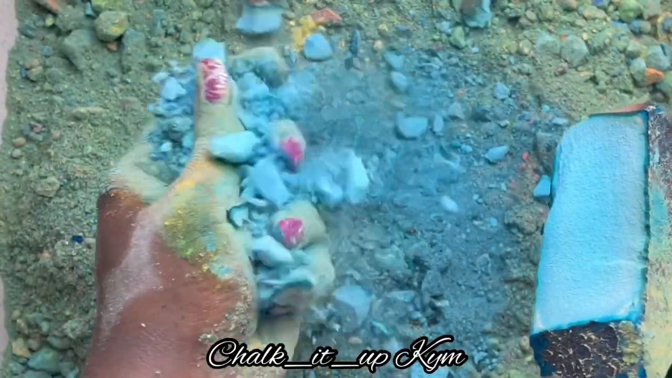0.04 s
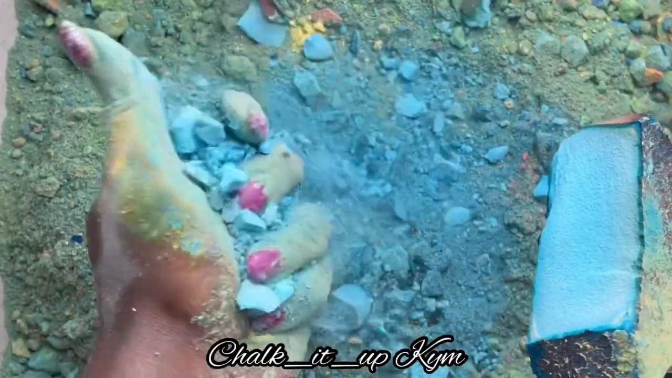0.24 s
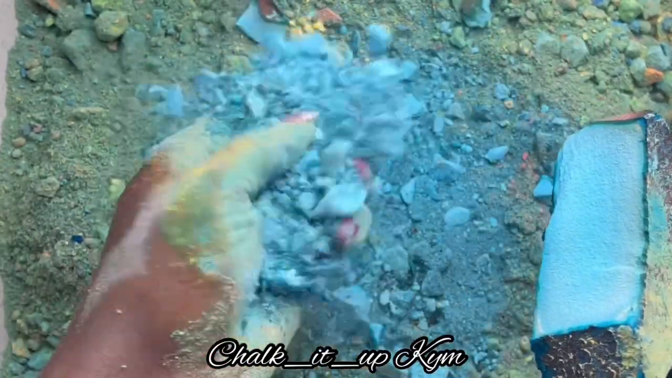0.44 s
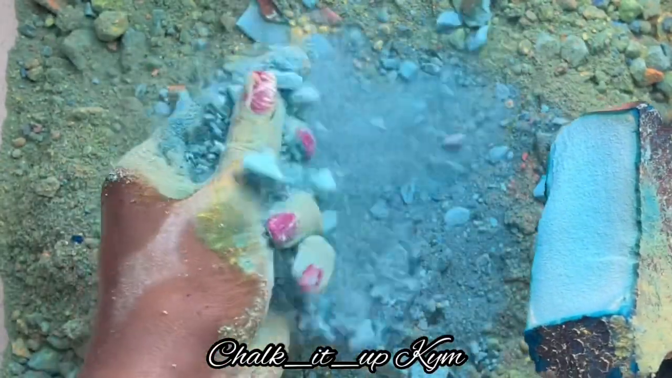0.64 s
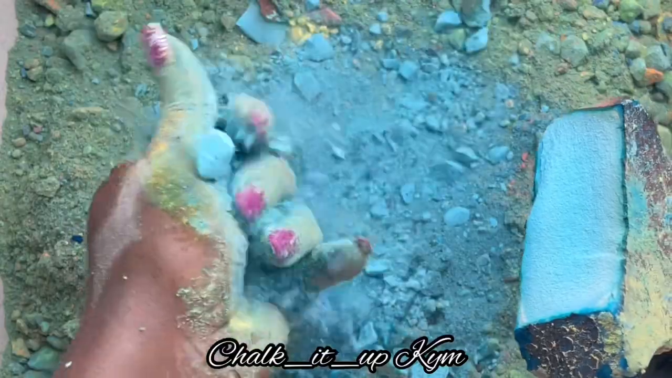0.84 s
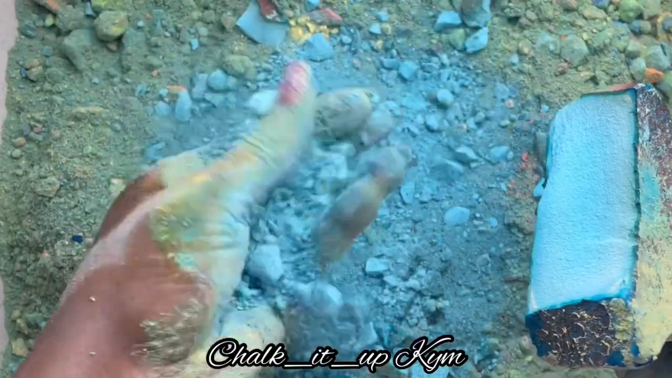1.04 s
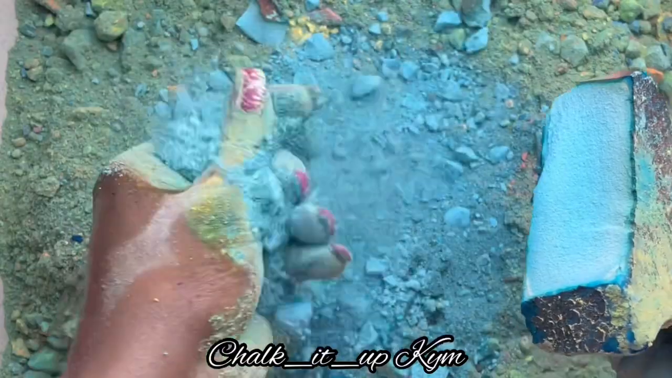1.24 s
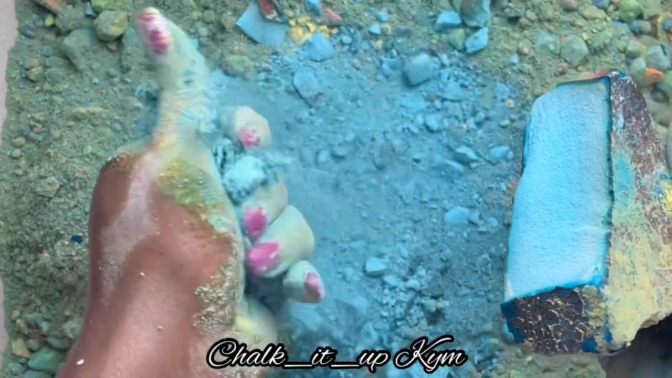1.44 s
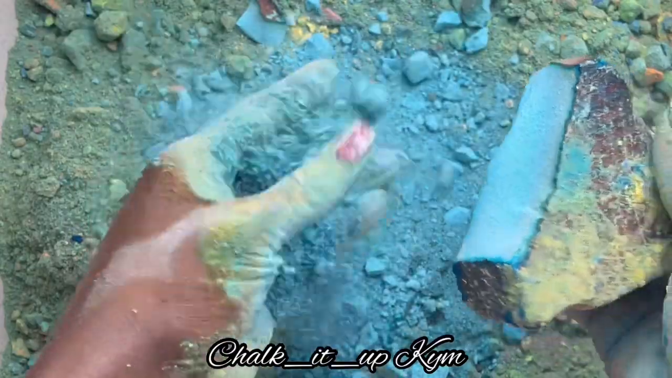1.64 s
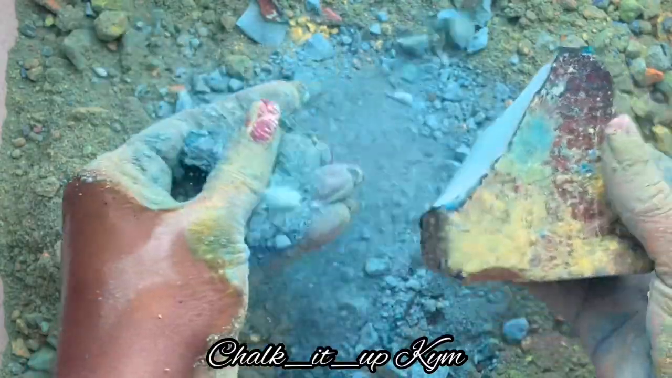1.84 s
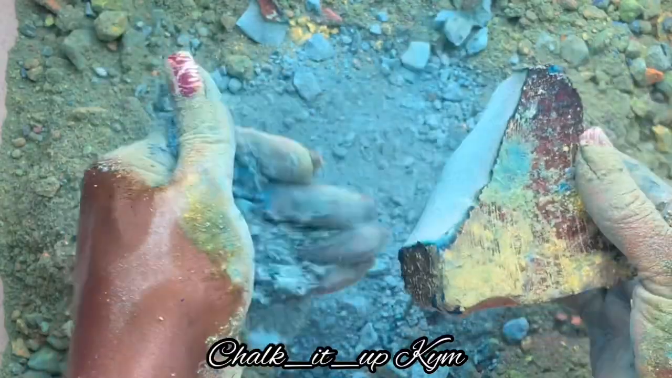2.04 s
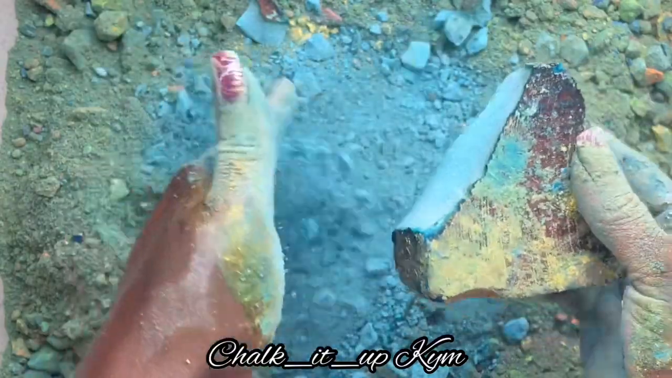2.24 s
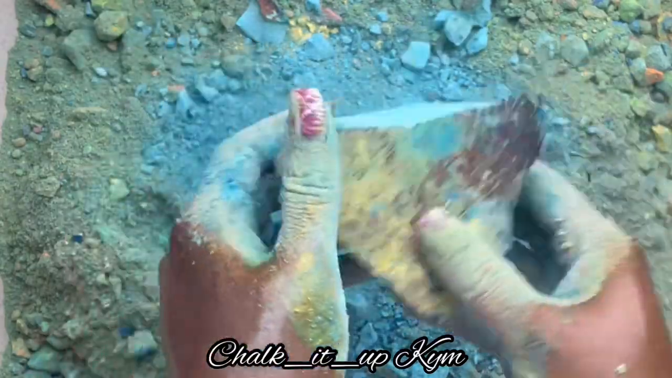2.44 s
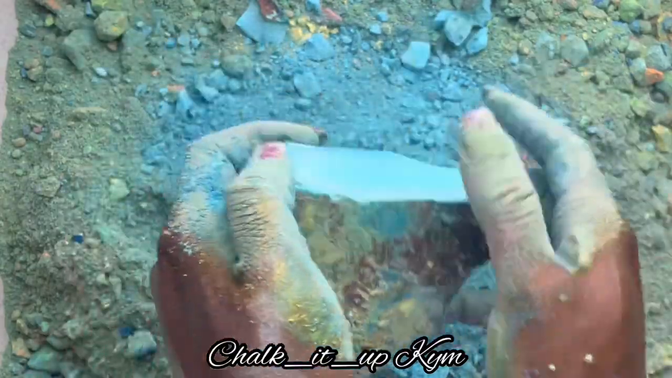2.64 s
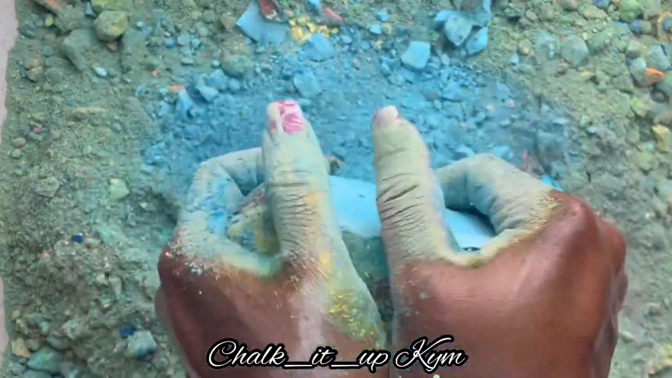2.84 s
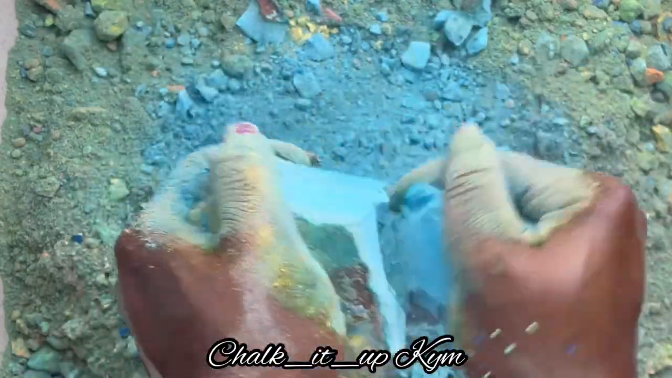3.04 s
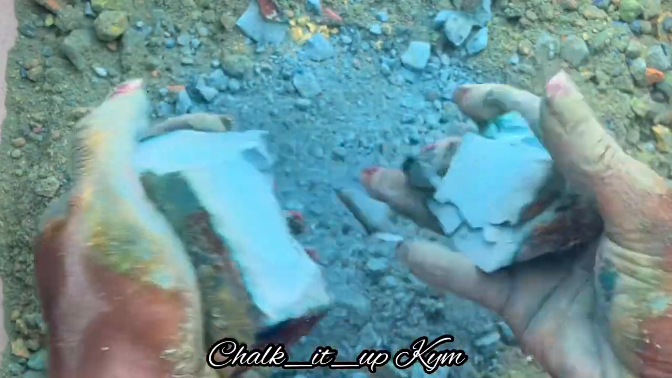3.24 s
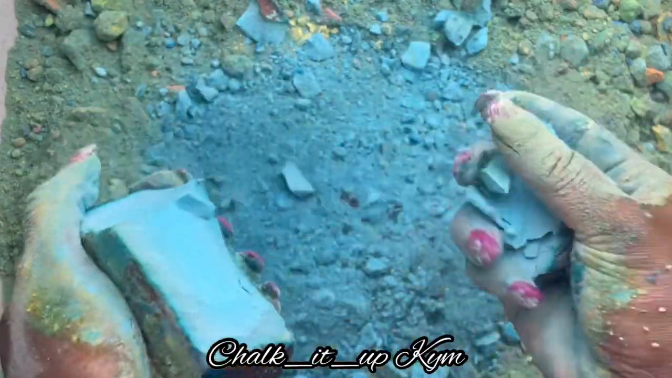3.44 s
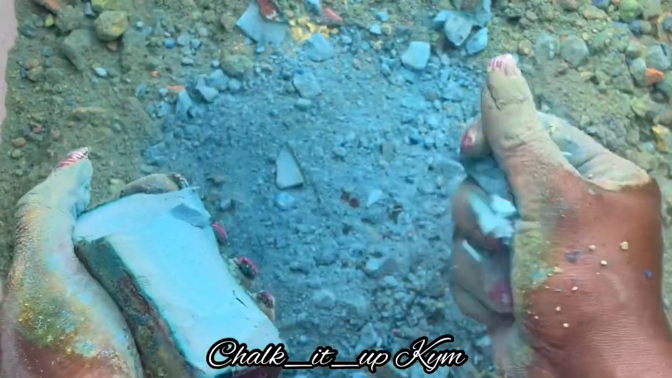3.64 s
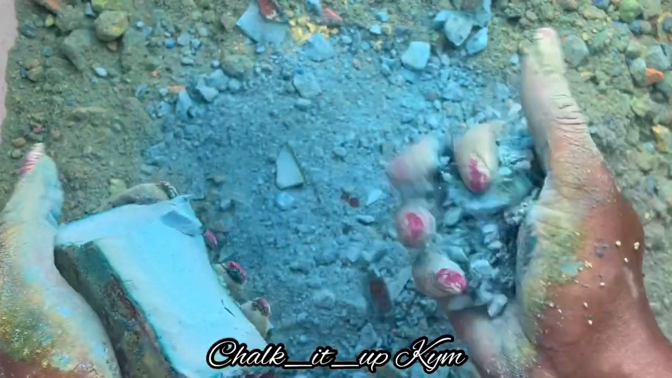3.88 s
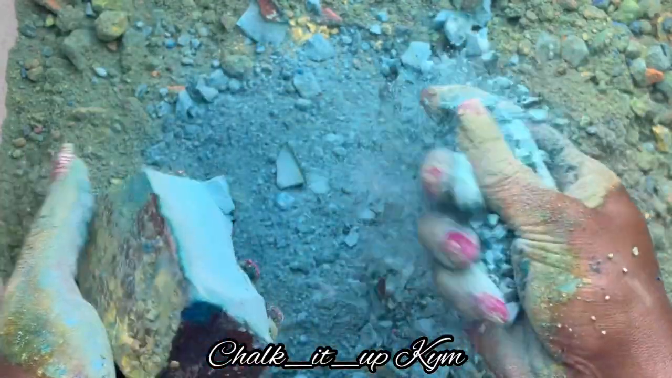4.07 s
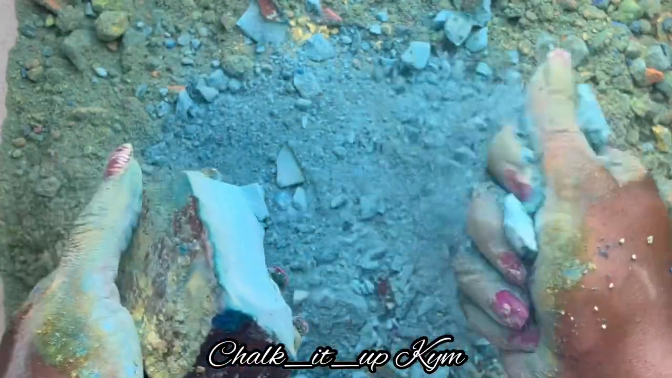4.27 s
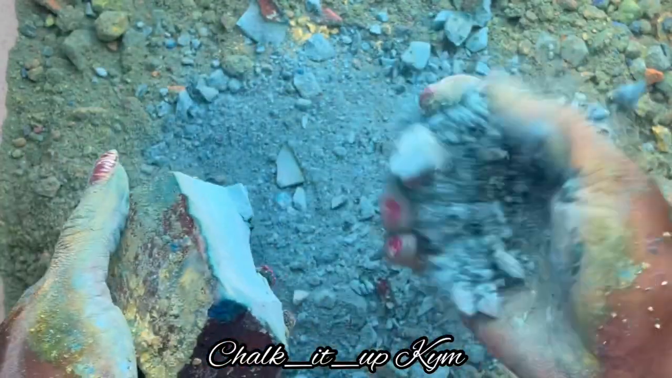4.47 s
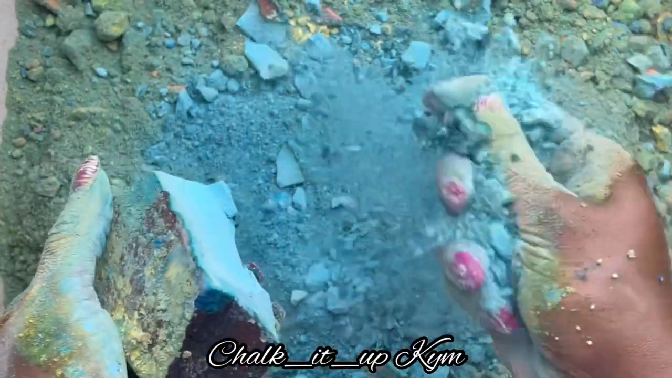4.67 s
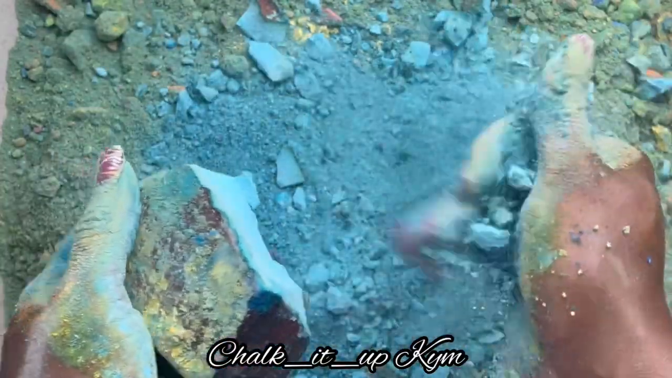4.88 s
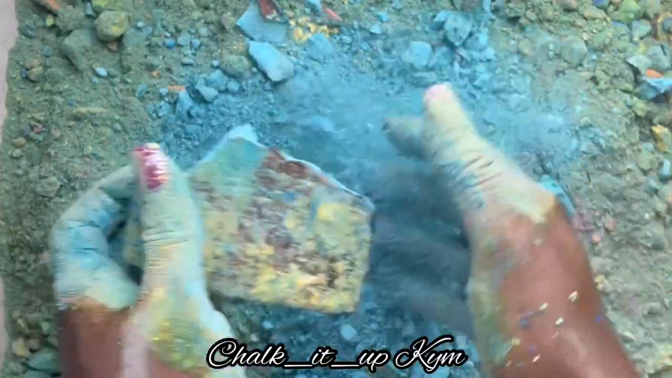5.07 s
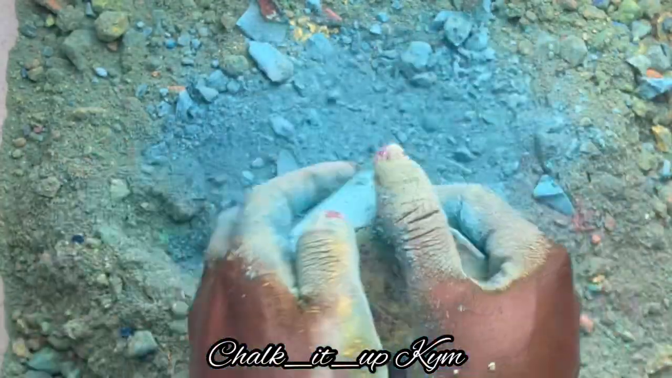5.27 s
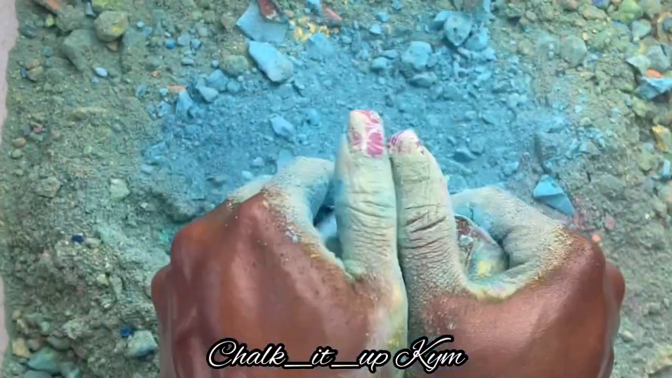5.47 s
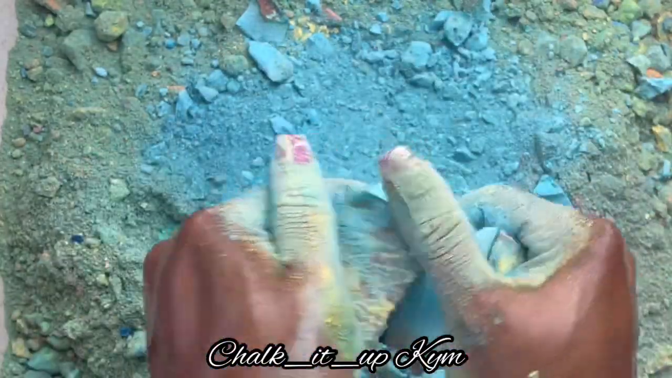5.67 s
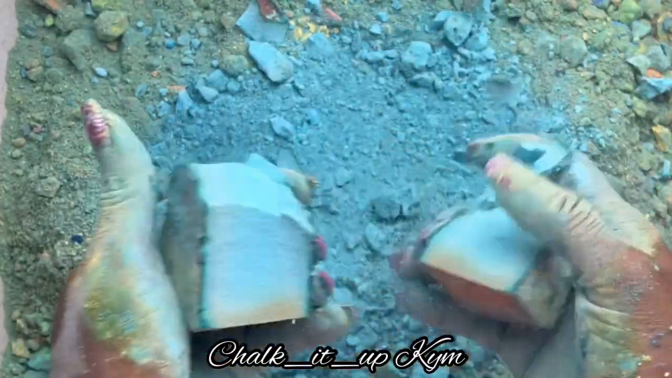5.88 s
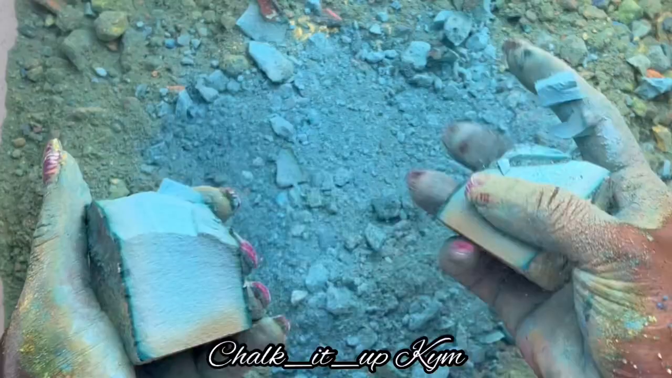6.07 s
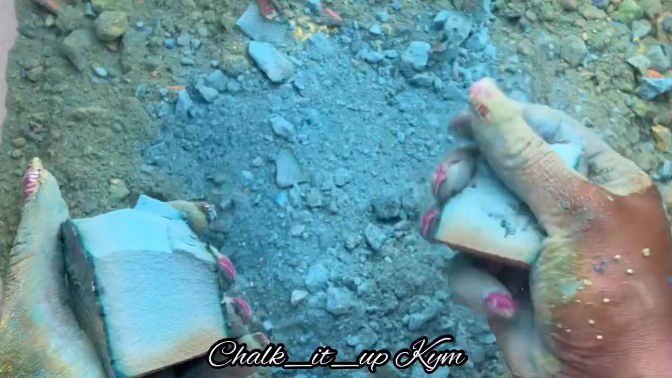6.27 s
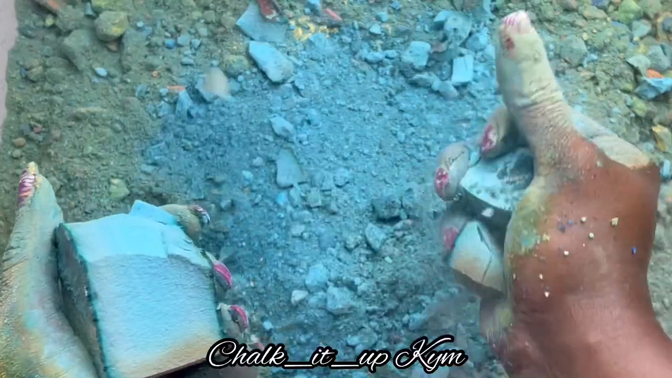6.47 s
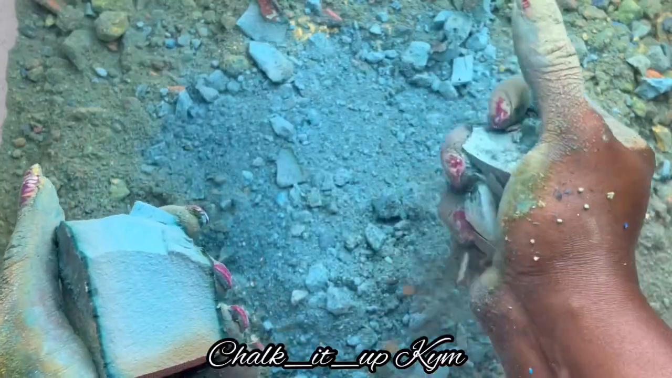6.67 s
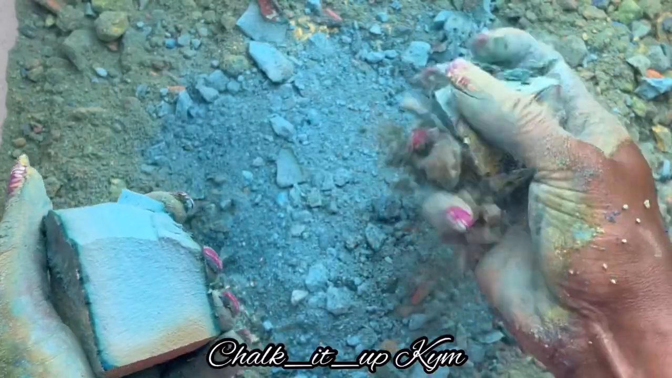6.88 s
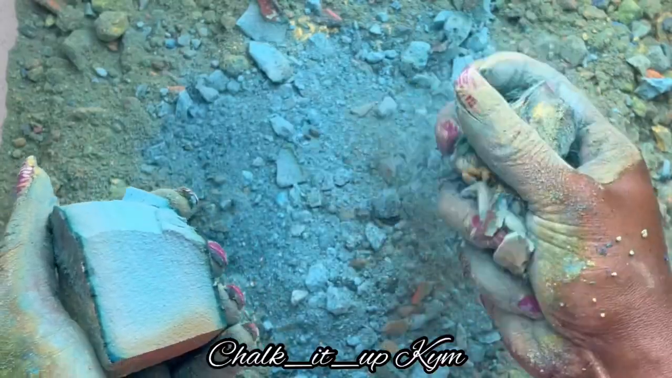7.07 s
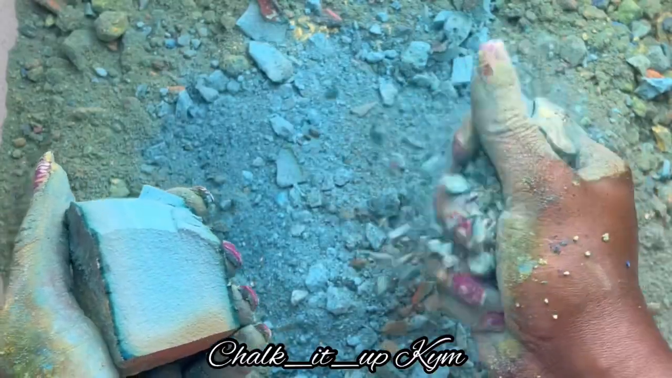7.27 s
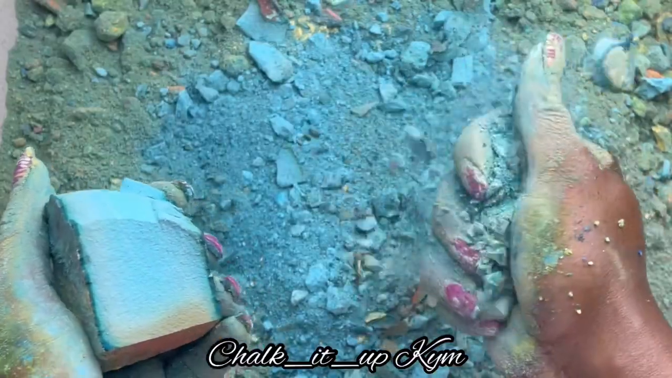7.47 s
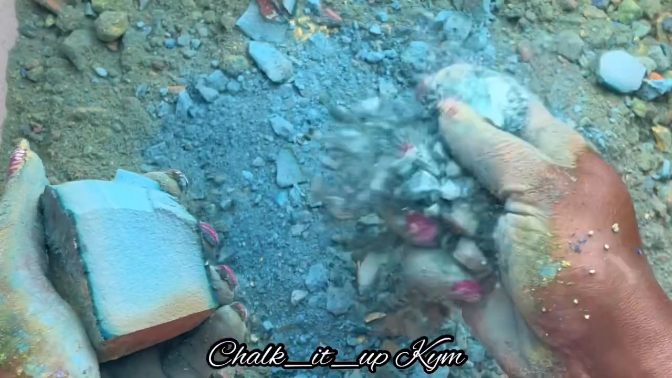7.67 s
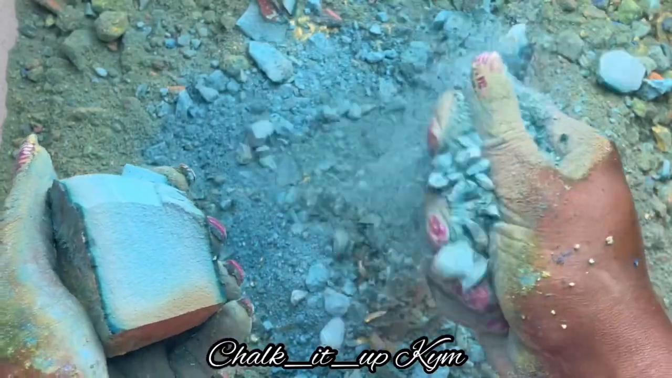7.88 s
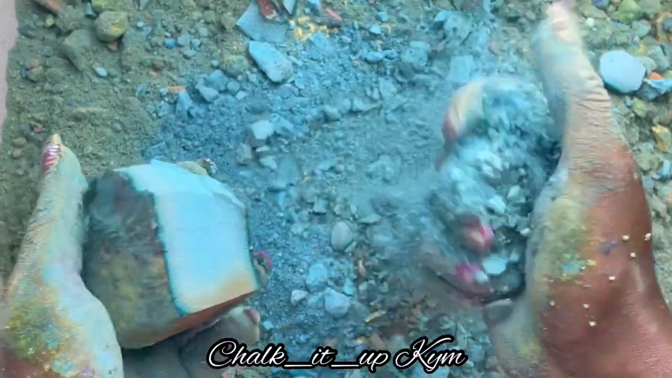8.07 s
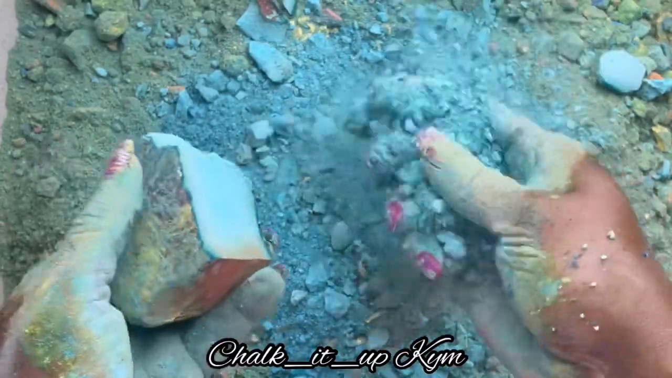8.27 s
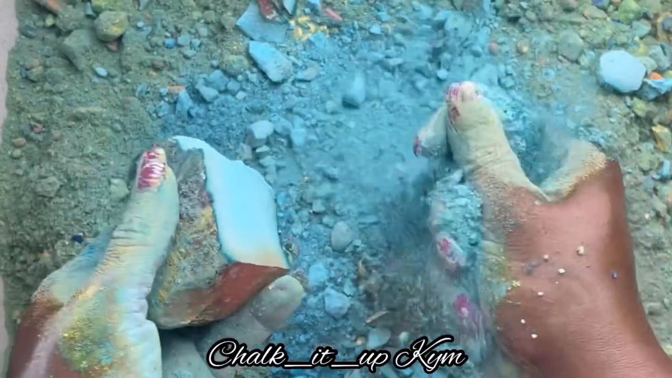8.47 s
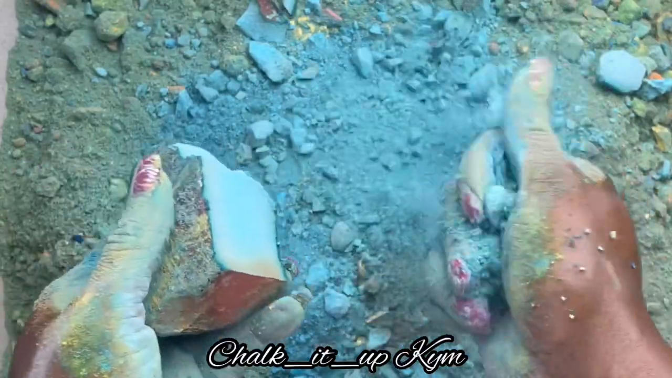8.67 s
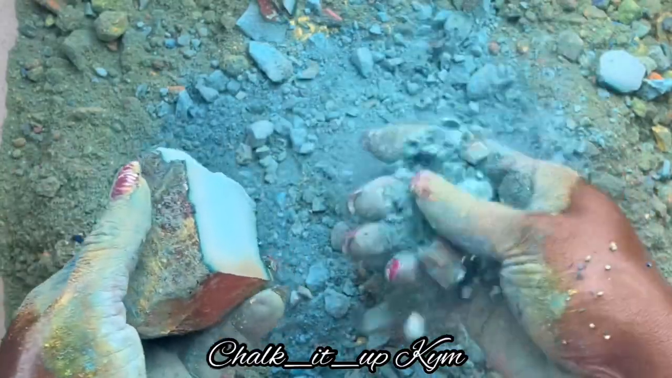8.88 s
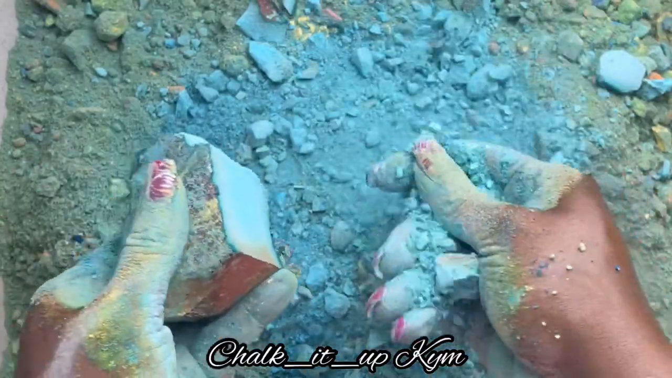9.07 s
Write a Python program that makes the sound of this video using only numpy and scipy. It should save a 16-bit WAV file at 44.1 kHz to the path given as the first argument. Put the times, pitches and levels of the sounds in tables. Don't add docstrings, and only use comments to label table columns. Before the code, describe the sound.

Very close, dry sound of hands crushing soft chalk over a tray of crumbs. Gritty crunches and muffled pops come first, then thin out into rubbing and a faint squeaky drag. A loud double-thudded snap breaks the block, more snaps follow, then quieter crumbling. Another block breaks, and a dense burst of cracks and crunching leads to settling crumbs. A low distant engine rumble and faint hum sit behind.

```python
import sys
import numpy as np
from scipy import signal
from scipy.fft import rfft, irfft, next_fast_len
from scipy.io import wavfile
from scipy.ndimage import uniform_filter1d

SR = 44100
rng = np.random.default_rng(int(sys.argv[2]) if len(sys.argv) > 2 else 0)


def store_wav(level_fs):
    pcm = np.round(np.clip(np.atleast_2d(level_fs), -1, 1) * 32767)
    wavfile.write(sys.argv[1], SR, pcm.T.astype(np.int16))


def elevation(decibels):
    levels = np.asarray(decibels, float)
    return 10 ** (levels / 20)


N = 402191

# centre in Hz,
# width in Hz, level in dB.
HAND_MODES = [(1400, 400, 0), (2030, 400, .5), (3000, 700, -9), (3950, 600, -15), (950, 450, -8)]
# start in s, peak in dB, ring in Hz.
BLOWS = [(0.043, -21, 547), (0.429, -28, 370), (0.485, -23.5, 434), (0.804, -26, 334), (1.162, -19.5, 335),
         (1.38, -22.5, 310), (1.799, -14.5, 364), (2.243, -26, 455), (2.737, -30.5, 115),
         (2.412, -32.5, 107), (2.9195, -4, 260), (3.498, -30.5, 268), (3.601, -17.5, 213),
         (3.884, -27.5, 460), (4.671, -21, 500), (5.025, -22, 209), (5.429, -27.5, 214), (5.5313, -4, 315),
         (5.698, -20, 360), (5.933, -26, 318), (6.194, -32, 121), (6.313, -21.5, 520), (6.328, -7.5, 174),
         (6.514, -17, 200), (7.123, -17, 192), (7.353, -19, 400), (7.534, -22, 497), (7.791, -21, 410),
         (7.979, -29.5, 114), (8.118, -29, 239), (8.336, -24.5, 207)]


def level(x, db):
    return x * elevation(db) / np.sqrt(np.mean(x ** 2))


def peak(x, db):
    return x * elevation(db) / np.max(np.abs(x))


def ring(x, hz, width_hz):
    hz = np.clip(hz, 20, .45 * SR)
    return signal.lfilter(*signal.iirpeak(hz, hz / max(width_hz, 1), fs=SR), x)


def colour(x, points):
    hz, db = np.transpose(points)
    size = next_fast_len(len(x))
    bins = np.fft.rfftfreq(size, 1 / SR) + 1
    gain = elevation(np.interp(np.log(bins), np.log(hz), db))
    return irfft(rfft(x, size) * gain, size)[:len(x)]


def curve(points):
    s, value = np.transpose(points)
    return np.interp(np.arange(N) / SR, s, value)


def walk(rate):
    hold = int(SR / rate)
    steps = np.repeat(rng.standard_normal(N // hold + 1), hold)
    return 1.3 * uniform_filter1d(uniform_filter1d(steps, hold), hold)[:N]


def grains(rate, spread_db):
    hit, size, sign = rng.random((3, N))
    return (hit < rate / SR) * elevation(-spread_db * np.log(size + .02)) * np.sign(sign - .5)


def hands(x):
    return sum(elevation(db) * ring(x, hz, width) for hz, width, db in HAND_MODES)


def room():
    # time in s, level in dB.
    rumble_levels = [(0.0, -46.5), (2.21, -54), (2.77, -48.5), (4.34, -50), (4.83, -47.5), (5.79, -49.5),
                     (7.11, -45), (7.49, -49), (9.12, -50)]
    # time in s, level in dB.
    hum_levels = [(0, -64), (4.2, -61), (4.8, -57), (6.2, -57), (6.9, -54), (7.8, -55), (9.12, -60)]
    # centre in Hz, level in dB.
    hum_lines = [(187, -69), (365, -63.5)]
    # frequency in Hz, density in dB per Hz.
    room_spectrum = [(15, -30), (25, 17), (59, 42), (285, 23), (354, -2.5), (863, -20), (2160, -5),
                     (4610, -85), (8830, -57), (16000, -22)]
    rumble = level(ring(ring(rng.standard_normal(N), 45.0, 31.5), 62.0, 63), -3.5)
    rumble += level(ring(rng.standard_normal(N), 51.7, 7), -3)
    phase = np.cumsum(2 * np.pi * 139 / SR + .012 * rng.standard_normal(N))
    hum = level(np.sin(phase), 0) * elevation(curve(hum_levels))
    hum += sum(level(ring(rng.standard_normal(N), hz, 2.3), db) for hz, db in hum_lines)
    air = level(colour(rng.standard_normal(N), room_spectrum), -62)
    return rumble * elevation(curve(rumble_levels)) + hum + air


def swells(rows, rest_db, step=64):
    t = np.arange(0, N, step) / SR
    s, db, rise, fall = np.transpose(rows)[:, :, None]
    gestures = db - 15 * np.where(t < s, (s - t) / rise, (t - s) / fall)
    power = np.interp(np.arange(N) / SR, t, np.sum(elevation(gestures) ** 2, axis=0))
    return 10 * np.log10(power + elevation(rest_db) ** 2)


def effort():
    # hardest moment in s, crumb patter in dB, build-up in s, release in s.
    squeezes = [(0.0, -33.5, .1, 0.24), (0.6, -40.5, 0.46, 0.1), (0.83, -37.5, 0.46, 0.15),
                (1.14, -38.5, 0.057, 0.24), (1.41, -47.5, 0.16, 0.62), (1.79, -46, 0.097, 0.11),
                (1.93, -41.5, 0.13, 0.16), (2.18, -55, 0.19, 0.96), (2.72, -56, 0.037, 0.16),
                (3.49, -44.5, 0.12, 0.051), (3.88, -42.5, 0.19, 0.054), (4.14, -39.5, 0.14, 0.3),
                (4.66, -41.5, 0.31, 0.69), (5.03, -46, 0.079, 0.11), (5.3, -45, 0.037, 0.089),
                (5.98, -54, 0.032, 0.062), (6.18, -52, 0.04, 0.25), (6.85, -45.5, 0.2, 0.051),
                (7.03, -33.5, 0.027, 0.096), (7.2, -42, 0.29, 0.16), (7.32, -29.5, 0.077, 0.068),
                (7.56, -36.5, 0.022, 0.12), (7.78, -37, 0.18, 0.12), (7.98, -37.5, 0.13, 0.045),
                (8.15, -42, 0.12, 0.12), (8.37, -32.5, 0.095, 0.11), (8.65, -48, 0.49, 0.2),
                (8.93, -44, 0.076, 0.53)]
    # densest moment in s, crumb patter in dB, release in s.
    showers = [
        (2.941, -39, 0.056),
        (3.62, -31, 0.077),
        (5.56, -45, 0.026),
        (5.721, -36, 0.041),
        (6.35, -32, 0.061),
        (6.529, -32, 0.063),
    ]
    # fastest moment in s, hiss in dB, build-up in s, release in s.
    rubs = [(0.19, -47, .4, 0.17), (1.79, -46, 0.14, 0.11), (2.18, -41, 0.022, 0.049),
            (2.45, -39, 0.15, 0.046), (2.72, -49, 0.064, 0.55), (2.9, -50, 0.08, 0.032),
            (3.38, -49.5, 0.39, 0.17), (3.49, -36.5, 0.075, 0.07), (3.62, -33.5, 0.042, 0.11),
            (4.14, -43.5, 0.33, 0.3), (4.95, -52, 0.56, 0.18), (5.29, -37.5, 0.077, 0.1),
            (5.72, -29.5, 0.039, 0.014), (5.8, -49, .045, 0.33), (5.98, -36.5, 0.019, 0.053),
            (6.18, -45, 0.083, 0.18), (6.85, -43, 0.074, 0.089), (7.15, -35, 0.064, 0.12),
            (5.55, -40, .015, .06), (7.98, -44, .3, 0.057), (8.37, -55, 0.28, 0.29)]
    shower_rise_s = 0.029
    falling = [(s, db, shower_rise_s, fall) for s, db, fall in showers]
    crumb_db = swells(squeezes + falling, -65.5)
    lag_s, rise_s, fall_s = 0.018, 0.01, 0.05
    shaken = [(s + lag_s, -24.5 + 0.8 * db, rise_s, fall_s) for s, db, _ in BLOWS]
    over_db = crumb_db + 45
    powder_db = swells(rubs, -51 + 0.57 * over_db)
    murmur_db = swells(shaken, -46.5 + .45 * over_db)
    return crumb_db, powder_db, murmur_db


def grinding():
    # frequency in Hz, density in dB per Hz.
    powder_spectrum = [(2000, -4.5), (3300, -2.5), (4500, -5), (8800, -3), (11500, -8.5), (16000, -11)]
    crumb_db, powder_db, murmur_db = effort()
    surge = walk(30)
    crumb_db += .7 * surge + .8 * walk(90)
    powder_db += .7 * surge + 1.4 * walk(60)
    murmur_db += .8 * surge + 1.3 * walk(20)

    ticks = grains(550, 4.3)
    debris = signal.lfilter([1], [1, -np.exp(-1 / (.002 * SR))], np.abs(ticks))
    ticks += .13 * debris * rng.standard_normal(N)
    bits = ticks + .3 * grains(2500, 3) + .07 * rng.standard_normal(N)
    dust = .5 * ticks + 1.2 * grains(220, 4.6) + grains(2000, 3.5) + .6 * rng.standard_normal(N)
    knocks = 0.67 * ticks + 0.22 * rng.standard_normal(N)

    crumbs = sum(elevation(db) * ring(bits * elevation(3.5 * walk(150)), hz, width) for hz, width, db in HAND_MODES)
    crumbs = level(ring(crumbs, 880, 2750), 0.03)
    patches = sum(elevation(3 * walk(50)) * ring(dust, hz, hz / 2) for hz in (3000, 5200, 8500, 13500))
    powder = level(colour(patches, powder_spectrum), 0.069)
    murmur = level(ring(knocks, 177, 190) + 0.27 * ring(knocks, 354, 260), 0.45)
    return crumbs * elevation(crumb_db) + powder * elevation(powder_db) + murmur * elevation(murmur_db)


def fractures():
    # start in s, peak in dB, ring in Hz.
    dull_knocks = [(0.0117, -24, 470), (0.2734, -32, 1460), (0.4026, -26, 1890), (0.5859, -26, 470),
                   (0.7645, -31, 1080), (0.7837, -28, 1940), (1.2856, -32, 1980), (1.3878, -21, 1960),
                   (1.3941, -28, 820), (1.7827, -35, 470), (1.8413, -29, 1850), (2.0119, -32, 1890),
                   (2.2486, -26, 1080), (2.6612, -38, 470), (2.6981, -30, 1080), (3.6427, -23, 1550),
                   (3.7502, -24, 520), (3.8969, -30, 1080), (4.1945, -32, 3140), (4.3406, -30, 1420),
                   (4.5132, -35, 1380), (4.7612, -31, 4050), (4.9899, -40, 470), (5.4359, -35, 470),
                   (5.9417, -30, 610), (6.3186, -21, 1420), (6.7028, -34, 3960), (7.1285, -20, 1030),
                   (7.2096, -26, 3450), (7.5636, -24, 650), (7.597, -28, 990), (7.6294, -33, 1030),
                   (7.7713, -28, 1460), (8.4817, -30, 2670), (9.0452, -23, 650), (9.0948, -34, 1940)]
    # start in s, peak in dB, ring in Hz.
    pops = [(0.0499, -10.5, 1580), (0.222, -20.5, 1190), (0.2461, -20.5, 1160), (1.1679, -11, 1420),
            (1.3887, -24, 1520), (1.677, -18, 1630), (1.805, -14.5, 1430), (1.9074, -14.5, 2180),
            (2.0118, -36, 1870), (3.888, -15.5, 1130), (3.899, -28, 1230), (6.3055, -20, 2120),
            (7.3206, -5.5, 2100), (7.35, -27, 2030), (7.7991, -17, 1260), (8.075, -21.5, 1520),
            (8.3412, -15.5, 1210), (9.0142, -17.5, 2030)]
    # start in s, peak in dB, ring in Hz, treble in dB re peak.
    chips = [(0.177, -12, 2010, -9), (0.3473, -21, 2230, 1), (0.57, -29, 3380, 3.5),
             (0.841, -19.5, 1830, -2.5), (1.244, -31.5, 1110, 11), (1.393, -20, 1350, -27),
             (2.249, -12, 1640, -12), (3.428, -13, 3000, 0), (3.476, -12.5, 2390, -0.5),
             (3.5184, -16, 4060, -8), (3.6691, -18, 2110, -2), (4.5143, -32, 3690, 2),
             (5.122, -23.5, 2069, -3.5), (6.392, -12.5, 2090, -6.5), (6.587, -17, 1060, -4),
             (7.2779, -8, 1930, -5.5), (7.3022, -8, 1990, 1), (7.3287, -14.5, 1840, -0.5),
             (7.333, -13, 3080, -13), (7.401, -18.5, 2040, -8), (7.5707, -17.5, 1720, 0),
             (8.3873, -33, 2090, 16.5), (8.473, -21.5, 1930, 0)]
    # start in s, peak in dB, ring in Hz, treble in dB re peak.
    splits = [(0.0809, -15, 1560, -11), (0.5742, -28, 2340, 0), (1.319, -34.5, 2670, 4),
              (1.7519, -32, 1890, 7.5), (1.9532, -19.5, 1820, -11), (2.158, -21.5, 794, 0),
              (2.7436, -20, 3060, 5.5), (3.536, -25, 3490, 4), (4.2973, -33, 2240, 12.5),
              (6.488, -21.5, 2100, 0), (6.4976, -18, 1950, -9), (6.5436, -18, 2040, -5),
              (6.5947, -16, 2220, -7), (6.6253, -25, 4080, -7), (6.7469, -18, 2060, -9),
              (6.963, -24.5, 2340, -2), (6.9976, -13.5, 3020, -7), (7.063, -14.5, 2300, -3),
              (7.2058, -22.5, 2510, 6), (7.359, -9, 2200, -9), (7.3782, -24, 2050, 1),
              (7.537, -11, 1360, -11), (7.646, -42, 1900, 15), (7.87, -35.5, 1960, 12),
              (7.9828, -11, 1940, -13)]
    # start in s, peak in dB, ring in Hz.
    crackles = [(0.094, -23, 2020), (0.447, -28, 2150), (0.5814, -20, 1590), (0.7114, -27, 1810),
                (0.8115, -22.5, 1380), (0.9583, -31, 1080), (0.9984, -26.5, 1160), (1.323, -28, 950),
                (1.3995, -24.5, 1540), (1.4881, -31, 2200), (1.5949, -29.5, 1250), (1.6773, -17, 1416),
                (1.7286, -34, 1500), (1.7826, -25, 1290), (1.8912, -29, 3320), (2.0118, -33, 1890),
                (2.1766, -28, 1850), (2.3696, -30, 1330), (3.4043, -32, 2450), (3.4197, -29, 2020),
                (3.685, -24, 2200), (3.8971, -19, 1250), (4.005, -26.5, 1420), (4.1141, -24, 1510),
                (4.1503, -26, 1380), (4.2149, -30, 2280), (4.4534, -16, 2640), (4.5132, -34, 1390),
                (4.559, -26, 2150), (4.6438, -20, 2840), (4.6863, -32, 1510), (4.7951, -27, 1890),
                (4.854, -24.5, 1380), (5.1014, -32, 1290), (5.942, -25, 1500), (6.2702, -36, 3140),
                (6.3184, -22, 1420), (6.5795, -23, 860), (6.8827, -25.5, 1340), (7.1971, -25, 2240),
                (7.21, -24, 3450), (7.2281, -24, 2280), (7.2615, -22, 2280), (7.3485, -14, 1940),
                (7.3942, -26, 1250), (7.467, -35, 3620), (7.6286, -29, 1030), (7.6456, -28, 1890),
                (7.7773, -25, 1340), (7.7987, -11, 1290), (8.0168, -27, 1380), (8.1836, -27.5, 1890),
                (8.3121, -33, 2370), (8.402, -34, 1980), (8.5082, -27, 1380), (8.6304, -34, 1250),
                (8.6503, -30.5, 1460), (8.753, -33.5, 1380), (9.0145, -26, 2170), (9.0584, -30.5, 1420)]
    # start in s, peak in dB, ring in Hz.
    crumbles = [(0.193, -16, 1280), (0.723, -17.5, 1390), (0.8088, -32, 1370), (1.1785, -24.5, 1310),
                (1.7888, -18, 1900), (4.553, -23.5, 2020), (5.022, -26, 1350), (5.035, -17.5, 1223),
                (5.147, -28, 900), (5.942, -15, 1430), (6.2902, -14.5, 1520), (6.7275, -16.5, 1400),
                (7.0475, -20, 1500), (7.7633, -21, 2030), (8.441, -21.5, 2270)]
    # start in s, peak in dB, ring in Hz, treble peak in dB.
    scuffs = [(0.436, -24, 1380, -56), (0.49, -32, 935, -52), (2.661, -42, 1300, -39),
              (2.699, -26, 3880, -28), (2.727, -34, 3080, -29), (2.868, -34, 3780, -34),
              (2.974, -26, 2910, -38), (3.255, -35.5, 4160, -34), (3.362, -35, 3490, -41),
              (3.573, -26, 2220, -23), (3.749, -26.5, 3490, -27.5), (4.632, -24.5, 2070, -47),
              (4.679, -25.5, 930, -28), (4.979, -28, 1330, -35), (5.436, -31.5, 2090, -31),
              (6.511, -25, 2000, -30), (6.5397, -20, 2100, -22), (8.011, -19.5, 1280, -34),
              (8.124, -22.5, 2040, -51), (9.045, -33, 1370, -58)]
    # start in s, peak in dB, ring in Hz, treble in dB re peak, tear length in ms.
    snaps = [(0.6337, -6.5, 2300, -30, .38), (0.6348, -7, 3000, -19, .38), (2.9253, -9, 1710, -6.5, 8.6),
             (2.934, -8, 1694, -40, 2.9), (3.4574, -17, 2260, -15, 3.7), (3.5018, -15, 2140, -5, 4),
             (3.599, -4, 1930, -35, 1.5), (3.6107, -0.5, 1870, -9, 4.5), (3.6187, 0, 4030, -9, 0.72),
             (5.5376, -7, 1400, -9, 3), (5.7025, 1.5, 1880, -40, .35), (5.7081, -9, 1400, -4, 1),
             (5.7147, -20, 1900, 5, 1.9), (6.333, -6, 1030, -22, 2.4), (6.3352, -4.5, 2290, 0.5, 3.8),
             (6.5183, -1.5, 2030, -1.5, 0.43), (6.5215, -6, 2180, -10, 2.3), (7.0252, -12.5, 3060, -6, 1.2),
             (7.045, -10.5, 2100, -31, .44), (7.1271, -5.5, 2000, -8.5, 4), (7.1445, -4, 1310, -28, 0.61),
             (7.1636, -6, 2470, -28, 0.6), (7.541, -11.5, 940, -33, 3)]
    # treble in dB re peak where not in the table, then tear length in ms
    breaks = [(*row, -37, 1.13) for row in dull_knocks]
    breaks += [(*row, -36, 0.3) for row in pops]
    breaks += [(*row, 0.63) for row in chips]
    breaks += [(*row, 0.76) for row in splits]
    breaks += [(*row, -48, 1) for row in crackles]
    breaks += [(*row, -52, 1.22) for row in crumbles]
    breaks += [(s, db, hz, treble_db - db, 2.9) for s, db, hz, treble_db in scuffs]
    return breaks + snaps


def cracks(span=2500):
    t = np.arange(span) / SR
    out = np.zeros(N + span)
    high = signal.butter(1, (4500, 10000), "band", fs=SR, output="sos")
    soft = signal.butter(2, (380, 5600), "band", fs=SR, output="sos")
    for s, db, hz, treble_db, tear_ms in fractures():
        noise = rng.standard_normal((2, span))
        tear_s = max(tear_ms - .45, .1) / 1000
        fade = .3 * np.exp(-(t / (1.8 * tear_s)) ** 2) + elevation(-26) * np.exp(-t / .005)
        tear = noise[0] * np.abs(noise[1]) * fade
        spray = peak(signal.sosfilt(high, tear + .4 * (t == 0)), db + treble_db)
        tear[0] += 1
        body = ring(tear, hz, .3 * hz) + .4 * hands(tear) + .07 * tear
        body = signal.sosfilt(soft, body)
        i = int(s * SR)
        out[i:i + span] += peak(body, db) - spray
    return out[:N]


def thumps(span=4000):
    t = np.arange(span) / SR
    out = np.zeros(N + span)
    for s, db, hz in BLOWS:
        push = np.sin(np.pi * np.clip(2.2 * hz * t, 0, 1))
        push += .3 * uniform_filter1d(rng.standard_normal(span), size=30) * np.exp(-t / .02)
        thump = ring(push, hz, 0.63 * hz)
        thump += .5 * ring(push, 1.96 * hz, 310)
        thump += 0.19 * ring(push, 0.64 * hz, 60)
        thump = ring(thump, 2.55 * hz, 9.9 * hz)
        i = int((s + .0056) * SR)
        out[i:i + span] += peak(thump, db)
    return out[:N]


def flecks(span=600):
    # start in s, peak in dB, ring in Hz.
    fleck_hits = [(0.0479, -19.5, 9400), (0.1327, -28, 8790), (0.1876, -32, 5000), (0.2, -32, 5470),
                  (0.2604, -27, 5640), (0.2709, -33, 8700), (0.2963, -38, 8060), (0.4729, -40, 5300),
                  (0.4934, -37, 5560), (0.5083, -38, 5640), (0.5273, -32, 5510), (0.5842, -25, 5340),
                  (0.6041, -25, 8870), (0.7834, -30, 5340), (0.9174, -31, 10770), (1.1165, -37, 4870),
                  (1.2861, -33, 5730), (1.309, -33, 7800), (1.3574, -37, 5380), (1.494, -29.5, 5600),
                  (1.5729, -28, 5680), (1.5864, -31, 5530), (1.9087, -26, 5120), (2.8615, -22, 12230),
                  (2.8795, -32, 12360), (3.2366, -32, 8610), (3.3315, -28, 8140), (3.6377, -20, 8870),
                  (3.85, -33, 5120), (3.9805, -39, 8870), (4.2149, -29, 7320), (4.4614, -34, 6370),
                  (4.6629, -29, 6200), (4.7033, -27, 6630), (4.7946, -36, 5990), (4.843, -29, 7800),
                  (4.8969, -30, 9000), (5.05, -28, 11930), (5.942, -28, 6460), (6.2702, -38, 5770),
                  (6.3057, -28, 5000), (6.3705, -25, 8400), (6.587, -19, 6200), (6.7003, -35, 10590),
                  (6.875, -26, 10030), (7.2276, -29, 9300), (7.4665, -38, 8870), (7.4745, -39, 6850),
                  (7.6082, -26, 8790), (7.6147, -35, 8830), (7.8262, -30, 5680), (7.8397, -33, 6500),
                  (8.2847, -28.5, 5600), (8.4079, -29, 6980), (8.4298, -29, 7670), (8.4633, -29, 9520),
                  (8.4816, -25, 5730), (8.573, -31, 8530), (8.8778, -41, 7880), (9.1103, -35, 6070)]
    # start in s, peak in dB, ring in Hz.
    sprays = [
        (5.5378, -13, 10000),
        (5.5392, -12, 10000),
        (6.9976, -24, 10400),
        (7.5374, -24, 13200),
        (7.1368, -26, 10000),
    ]
    decay_s, width_share = 0.84e-3, 0.24
    t = np.arange(span) / SR
    out = np.zeros(N + span)
    for s, db, hz in fleck_hits + sprays:
        tick = rng.standard_normal(span) * np.exp(-t / decay_s)
        i = int(s * SR)
        out[i:i + span] += peak(ring(tick, hz, width_share * hz), db)
    return out[:N]


def slides():
    # start in s, end in s, level in dB, list of modes in Hz.
    drags = [
        (2.36, 2.49, -41, [3370, 3770, 5500, 9500]),
        (5.18, 5.4, -43, [2950, 3480, 4830, 6130]),
        (3.22, 3.32, -50, [3930]),
    ]
    t, out = np.arange(N) / SR, np.zeros(N)
    for start, end, db, modes in drags:
        rub = rng.standard_normal(N)
        swell = np.sin(np.pi * np.clip((t - start) / (end - start), 0, 1)) ** 0.24
        song = sum(elevation(3.5 * walk(40)) * ring(rub, hz, .035 * hz) / hz for hz in modes)
        out += swell * level(song, db)
    return out


def reflections(x):
    t = np.arange(6000) / SR
    tail = ring(rng.standard_normal(len(t)), 860, 8900) * np.exp(-np.log(1000) * t / 0.022)
    tail *= t > .003
    return signal.fftconvolve(x, tail / np.sqrt(np.sum(tail ** 2)))[:N]


def scene():
    chalk = cracks() + thumps() + grinding() + slides() + flecks()
    return (chalk + elevation(-17.0) * reflections(chalk) + room())[None]


def top_cut(x):
    return signal.sosfilt(signal.butter(12, 16830, fs=SR, output="sos"), x)


def record(dry):
    cut = signal.sosfilt(signal.ellip(8, .2, 60, 15800, fs=SR, output="sos"), dry)
    limited = np.clip(cut, -.86, .86)
    held = signal.sosfilt(signal.ellip(8, .2, 60, 16750, fs=SR, output="sos"), limited)
    return top_cut(held)


dry = scene()
out = record(dry)
store_wav(out)
```